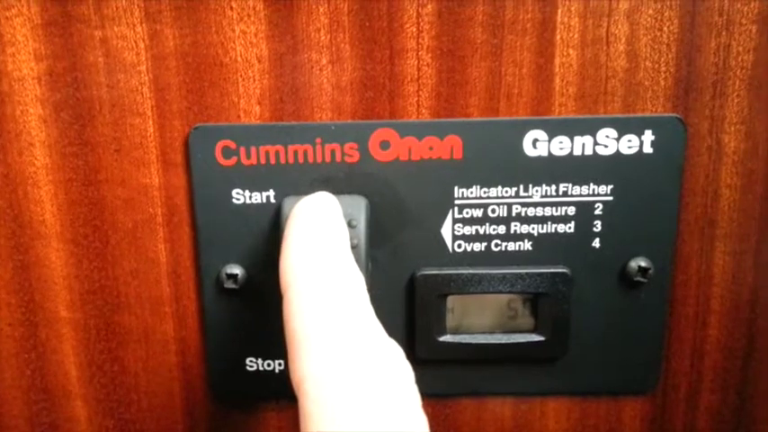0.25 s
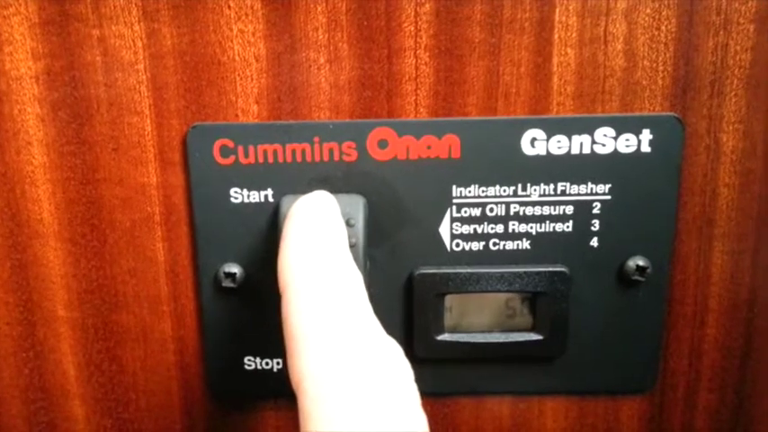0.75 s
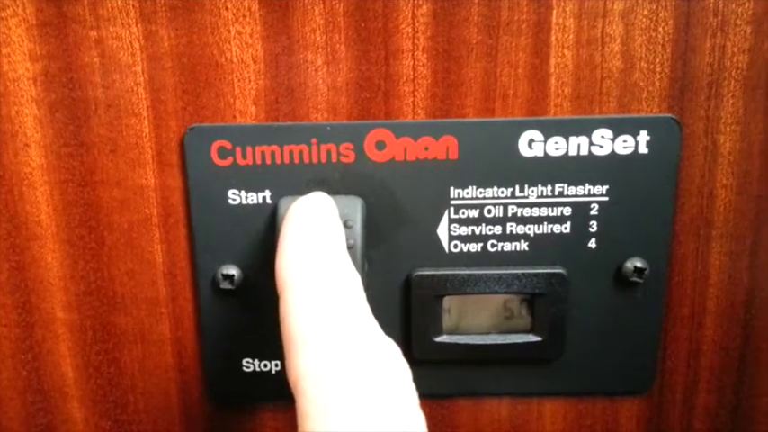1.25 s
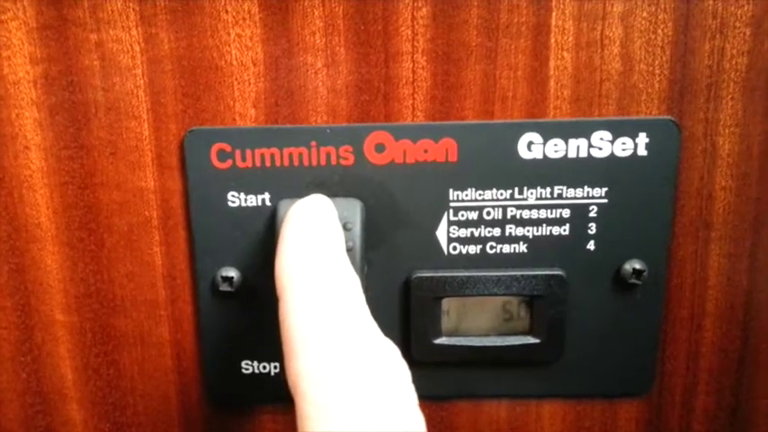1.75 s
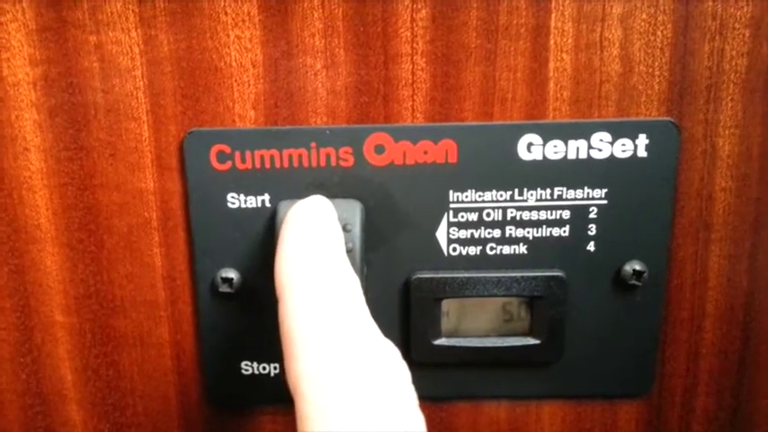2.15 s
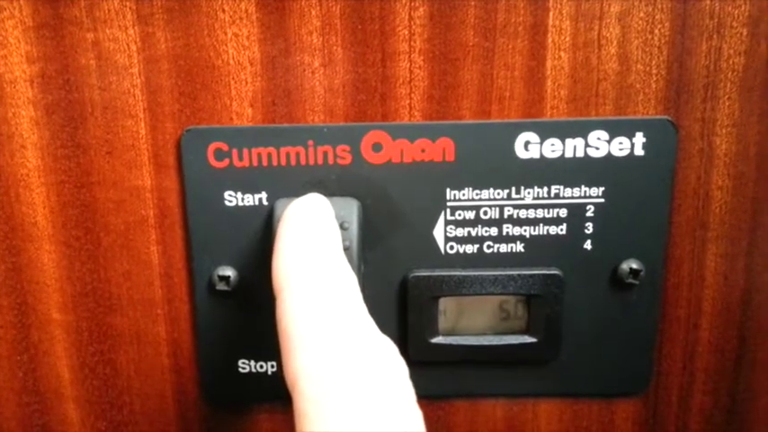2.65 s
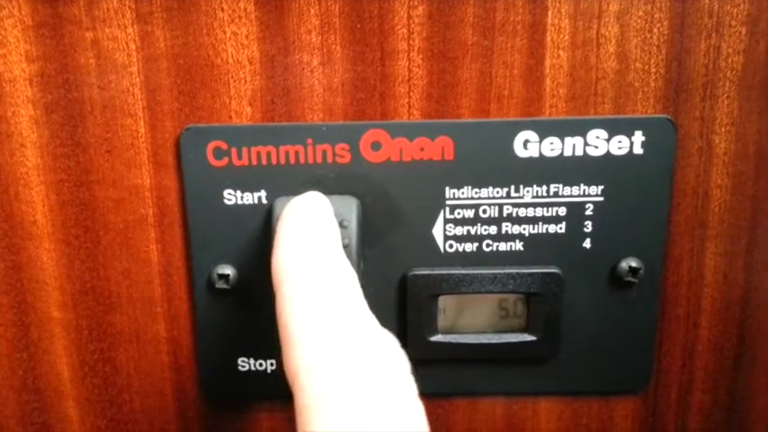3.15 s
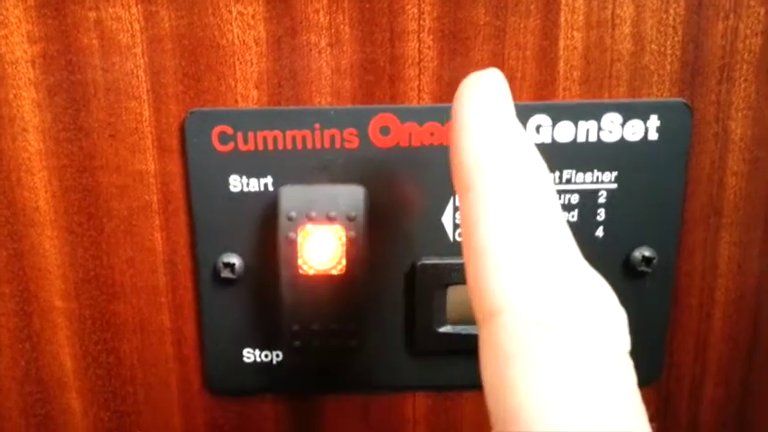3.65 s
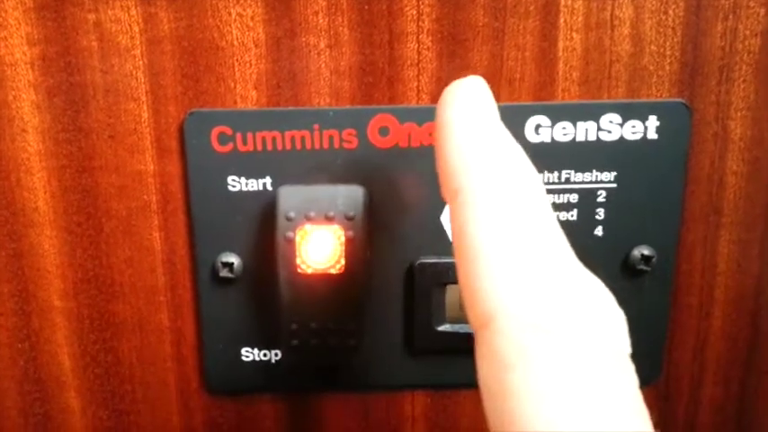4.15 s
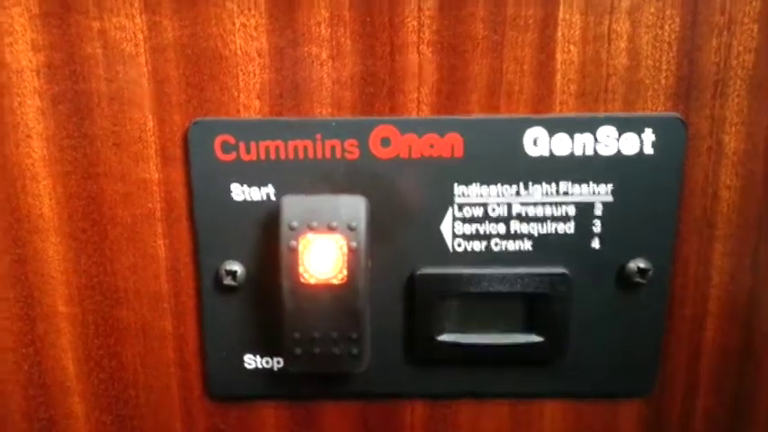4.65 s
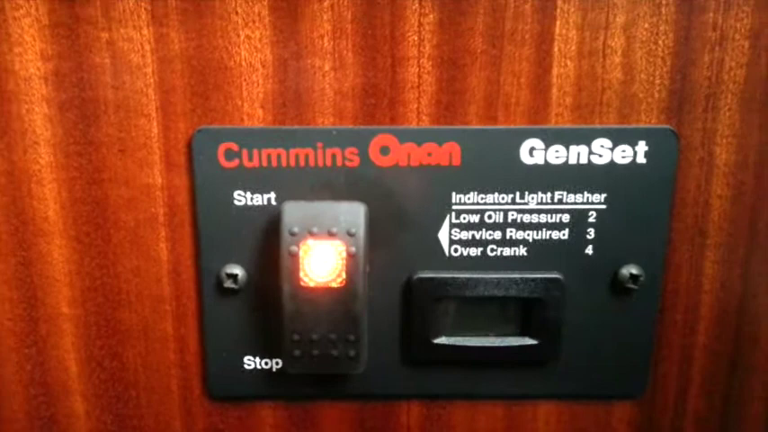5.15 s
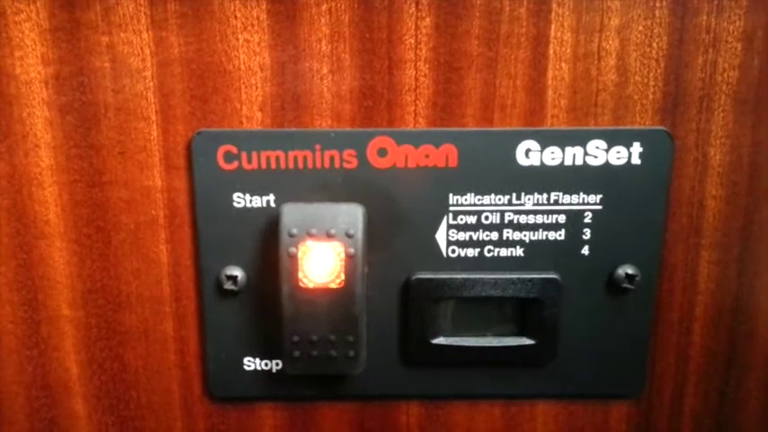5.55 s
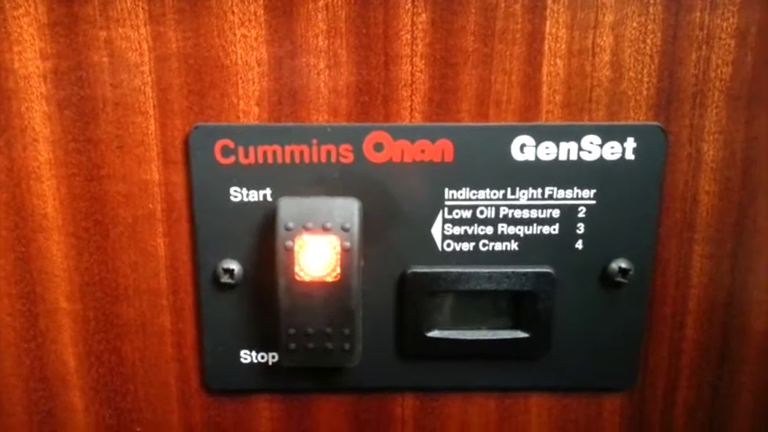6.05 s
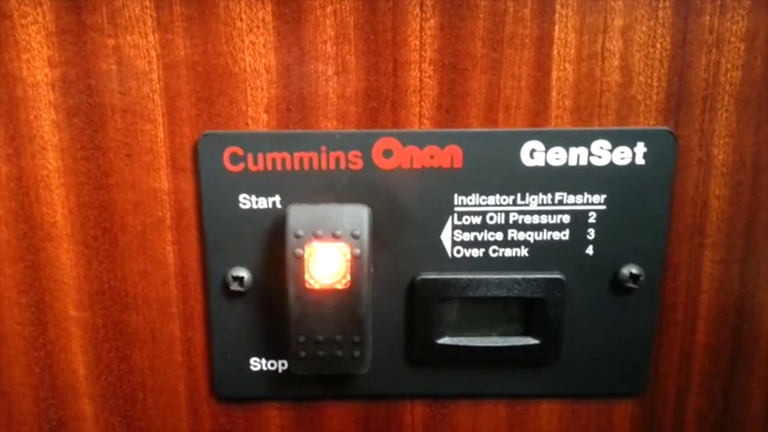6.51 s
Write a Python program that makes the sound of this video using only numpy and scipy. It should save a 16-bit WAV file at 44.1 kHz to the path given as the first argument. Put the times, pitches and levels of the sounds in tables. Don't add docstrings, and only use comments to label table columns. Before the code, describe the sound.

Indoors in a small padded camper cabin, a phone microphone is close to a wall switch, with the generator beneath the floor. From 0 to about 2.5 s the starter cranks steadily: gritty metallic gear whine, bright brush noise, low rumble and compression thumps at roughly 37 per second. From 2.55 s weak firings make the whine slip and rise; the engine catches near 2.9 s and the starter drops out. Low separate bangs accelerate, and at 3.29 s the rocker snaps back with tiny plastic bounces. Hard uneven firing knocks the floor and raps the cover, loudest around 3.4 to 3.7 s. By about 4 s it is a steady, buzzing low hum with faint hiss and thin electronic whine. Ticks and a cloth rub come at 4.6 s, small clicks at 6.02 s, then a relay clack at 6.07 s with a dying buzz and brief engine surge; the hum continues to the end at 6.8 s.

```python
import sys
import numpy as np
from scipy import signal
from scipy.io import wavfile

SR = 44100
rng = np.random.default_rng(int(sys.argv[2]) if len(sys.argv) > 2 else 0)


def volts(x):
    e = np.asarray(x, float) / 20
    return 10 ** e


def file_out(sig):
    cols = np.atleast_2d(sig).T
    lim = np.clip(cols, -1, 1)
    pcm = np.round(lim * 32767).astype(np.int16)
    wavfile.write(sys.argv[1], SR, pcm)


N = 298909
TIME = np.arange(N) / SR


def rms_one(x):
    return x / np.sqrt(np.mean(x ** 2) + 1e-20)


def ramp(x, start, length):
    return np.clip((x - start) / length, 0, 1)


def curve(rows):
    s, value = np.transpose(rows)
    return np.interp(TIME, s, value)


def swells(events, width_s):
    return sum(db * np.exp(-.5 * ((TIME - s) / width_s) ** 2) for s, db in events)


def jabs(events, fall_s):
    return sum(db * ramp(TIME, s, 0.0027) * np.exp(-np.maximum(TIME - s, 0) / fall_s) for s, db in events)


def drift(rate_hz):
    r = np.exp(-2 * np.pi * rate_hz * 40 / SR)
    slow = signal.lfilter([1], [1, -2 * r, r * r], rng.standard_normal(N // 40 + 2002))[2000:]
    return np.interp(np.arange(N) / 40, np.arange(len(slow)), rms_one(slow))


def ring(clicks, hz, t60):
    r, w = volts(-60 / (t60 * SR)), 2 * np.pi * hz / SR
    return signal.lfilter([0, np.sin(w)], [1, -2 * r * np.cos(w), r * r], clicks + 1e-18)


def resonances(x, peaks):
    out = 0
    for k, (hz, width_hz, db) in enumerate(peaks):
        r = np.exp(-np.pi * width_hz * 1.55 / SR)
        pole = [(1 - r * r) / 2, 0, (r * r - 1) / 2, 1, -2 * r * np.cos(2 * np.pi * hz / SR), r * r]
        out = out + (-1) ** k * volts(db) * signal.sosfilt([pole, pole], x)
    return rms_one(out)


def coloured(spectrum, patchy_db):
    hz, db = np.transpose(spectrum)
    out, white = 0, rng.standard_normal((2, N))
    edges = np.geomspace(hz[0], hz[-1], int(3 * np.log2(hz[-1] / hz[0])) + 1)
    for k, (low, high) in enumerate(zip(edges, edges[1:])):
        sos = signal.butter(2, [low, high], "band", fs=SR, output="sos")
        band = signal.sosfilt(sos, white[k % 2])
        band_db = np.interp(np.log(low * high) / 2, np.log(hz), db)
        out = out + volts(band_db + patchy_db * drift(9.1)) * band
    return rms_one(out)


def marks(phase):
    return np.diff(np.floor(phase), prepend=np.floor(phase[0]))


def orders(cycle, table, scatter, wobble_db):
    out = 0
    for multiple, db in table:
        start = scatter * 2 * np.pi * rng.random()
        out = out + volts(db + wobble_db * drift(6.0)) * np.cos(2 * np.pi * multiple * cycle + start)
    return out / np.sqrt(np.sum(volts(np.array(table)[:, 1]) ** 2) / 2)


def struck(hits, modes, scatter_db, dulls=0):
    s, db = np.transpose(hits)
    chance, out = rng.standard_normal((len(s), len(modes))), 0
    for k, (hz, mode_db, t60) in enumerate(modes):
        clicks = np.zeros(N)
        lost_db = dulls * 1000 * (s - s[0]) * max(np.log2(hz / 3300), 0)
        clicks[np.round(s * SR).astype(int)] = volts(db + mode_db - lost_db + scatter_db * chance[:, k])
        out = out + (-1) ** k * ring(clicks, hz, t60)
    return out


# frequency in Hz, level in dB per Hz.
HISS = [(1470, -29), (2500, -5), (3480, -18), (5330, -12), (6150, 0), (6780, -19), (13900, -21),
        (15000, -27)]


def air_hiss(effort_db):
    return coloured(HISS, patchy_db=2.0) * volts(-56 + 0.029 * effort_db) * (1.11 + 0.045 * ramp(TIME, 2.85, 0.036))


# frequency in Hz, level in dB rms.
WHINE = [(1668.5, -42.5), (6674, -73)]


def panel_whine():
    tones = 0
    for hz, db in WHINE:
        tones = tones + volts(db + 1.8 * drift(1.4)) * np.sin(2 * np.pi * hz * TIME + 0.66 * drift(3.4))
    return np.sqrt(2) * tones * ramp(TIME, 3.26, 0.41) ** .5


# start in seconds, level in dB, attack in seconds, hold in seconds,
# release in dB per second.
RUSTLE = [
    (4.424, -54, 0.03, .02, 200),
    (4.594, -40, 0.013, 0.012, 250),
    (4.619, -47, 0.021, 0.042, 500),
    (4.70, -60, .01, 0.03, 200),
]


def rustle():
    grains = rng.standard_normal(N) * volts(2.0 * drift(150))
    bright = signal.sosfilt(signal.butter(1, [3000.0, 12000.0], "band", fs=SR, output="sos"), grains)
    level = 0
    for s, db, attack, hold, release in RUSTLE:
        fallen_db = release * np.maximum(TIME - s - attack - hold, 0)
        level = level + ramp(TIME, s, attack) ** 2 * volts(db - fallen_db)
    return rms_one(bright) * level


# start in seconds, peak in dB, low edge in Hz, high edge in Hz,
# t60 in seconds.
TICKS = [(3.3395, -29, 1800, 15000, .02), (3.3401, -28.5, 4440, 5400, 0.022),
         (3.3405, -33, 6800, 7700, 0.022), (3.347, -36, 3000, 7000, 0.07), (3.3855, -37, 1800, 3510, .03),
         (3.386, -41, 3500, 7500, .02), (3.439, -32, 2500, 9300, 0.018), (3.446, -38, 3000, 9500, .09),
         (3.5505, -37.5, 4200, 5400, .03), (3.552, -44, 5500, 8000, .03), (4.5897, -20, 1800, 7500, .012),
         (4.5896, -36, 7500, 15000, .01), (4.597, -22, 1800, 3180, .02), (4.592, -34, 3500, 6500, 0.018),
         (4.597, -21.5, 5000, 9400, 0.028), (4.5968, -33, 9700, 15000, .015),
         (4.61, -26, 1800, 3440, 0.047), (4.612, -28, 6000, 13000, 0.057),
         (5.9988, -38, 9000, 14000, 0.034), (6.016, -24, 5600, 8400, 0.016),
         (6.016, -32, 2500, 5500, 0.014), (6.018, -30, 9000, 15000, .03), (6.027, -39, 8000, 14000, 0.027),
         (6.0255, -30, 3000, 7500, 0.023), (6.038, -43, 11000, 14000, .03)]


def ticks():
    out, length = np.zeros(N), 4000
    for s, db, low_hz, high_hz, t60 in TICKS:
        edges = [low_hz, np.clip(high_hz, low_hz + 200, .4 * SR)]
        dying = rng.standard_normal(length) * volts(-60 * TIME[:length] / max(t60, .003))
        burst = signal.sosfilt(signal.butter(3, edges, "band", fs=SR, output="sos"), dying)
        out[round(s * SR):][:length] += volts(db) * burst / np.max(np.abs(burst))
    return out


# frequency in Hz, level in dB, t60 in seconds.
SWITCH = [(330, -16, .014), (780, -16.5, 0.021), (1134, -13.5, .03), (1484, -10.5, 0.038),
          (1850, -18.5, .025), (2140, -19.5, .02), (2280, -12, .025), (3130, -7.5, 0.025), (4400, -19, .02),
          (5400, -16, 0.017), (6050, -9, .006), (7200, -11, 0.0085), (9750, -1, 0.0063),
          (12400, -30, .0055)]
# time in seconds, level in dB.
SNAPS = [
    (3.2872, -32),
    (3.2915, -24),
    (3.29307, -6),
    (3.29403, -11),
    (3.29531, -3),
    (3.2969, -8.5),
    (3.29786, -9.5),
    (3.2998, -9),
    (3.3068, -20),
]


def rocker_switch():
    return struck(SNAPS, SWITCH, scatter_db=4.5, dulls=0.66)


def cabin(x):
    tail = rng.standard_normal(9000) * volts(-60 * TIME[:9000] / 0.054)
    tail = signal.lfilter([.5], [1, -.5], tail)
    return x + volts(-27.5) * signal.fftconvolve(x, tail)[:N]


# frequency in Hz, level in dB, t60 in seconds.
RELAY = [(1286, -1.5, 0.022), (1510, -10, 0.035), (1730, -12.5, 0.11), (1910, -28, 0.14),
         (3390, -24, 0.054), (4190, -24, 0.04), (4600, -28, 0.04), (4640, -35, .15), (6650, -34, 0.1),
         (7500, -37, 0.2), (8300, -40, 0.13)]
# time in seconds, level in dB.
CLOSING = [
    (6.0695, -18),
    (6.072, -12),
    (6.078, -26),
    (6.089, -21),
    (6.11, -21),
    (6.1222, -26),
    (6.135, -25),
    (6.152, -26),
]
# frequency in Hz, level in dB per Hz.
THUD = [(530, -37), (900, -28), (1270, -17), (1360, -11), (1710, 5), (2140, -2), (3760, -27), (4580, -22),
        (7720, -28), (9500, -54), (12400, -71), (20900, -120)]
# frequency in Hz, width in Hz, level in dB.
PANELS = [(1750, 300, 5), (3250, 300, -6), (4250, 400, 3), (4700, 300, 0), (6500, 400, -10),
          (7500, 400, -4)]


def relay():
    since = TIME - CLOSING[0][0]
    after = np.maximum(since, 0)
    tail = coloured(THUD, patchy_db=1.5) * ramp(since, 0, .004) * volts(-32.5 - 60 * after / 1.6)
    buzz = resonances(rng.standard_normal(N), PANELS) * ramp(since, 0, .006) * volts(-45 - 60 * after / 1.16)
    return struck(CLOSING, RELAY, scatter_db=0.0, dulls=.03) + tail + buzz


# frequency in Hz, width in Hz, level in dB.
GEAR = [(790.5, 11, -4), (883, 23.4, -3.5), (985, 57, -7.5), (1139, 40, -4.5), (1454, 65, -10.5),
        (1559, 15, -8), (1847, 140, -10), (1966, 29.6, 2.5), (2055, 200, -9), (2118, 59, -2)]


def gear_whine(mesh, speed):
    helped = ramp(speed, 9.5, 1.4)
    alone = resonances(mesh, GEAR)
    raised = resonances(mesh, np.multiply(GEAR, [1.045, 1, 1]))
    whine = (1 - helped) * alone + helped * raised
    return whine / np.sqrt(1 - 2.0 * helped * (1 - helped))


# frequency in Hz, width in Hz, level in dB.
BRUSH = [(2745, 56, 1), (3225, 35, 2.5), (3706, 41, 2.5), (5770, 200, -7.5), (6220, 29, 3), (6520, 230, -2),
         (7290, 110, -5.5), (7800, 220, -2), (8900, 1000, -20), (9630, 140, -11), (9980, 140, -10)]
# frequency in Hz, width in Hz, level in dB.
SQUEAL = [(6660, 150, 1), (7500, 350, -20)]
# multiple of the cycle, level in dB.
CRANK_ORDERS = [(4, -67), (5, -70), (6, -57), (7, -55.5), (8, -65), (9, -51), (10, -51), (11, -66),
                (14, -37), (17, -55), (18, -40), (19, -54), (20, -49), (21, -43), (22, -55), (23, -44),
                (24, -46), (25, -45), (26, -46), (27, -47), (28, -42), (29, -52), (30, -47), (31, -48),
                (32, -47), (36, -50)]
# frequency in Hz, level in dB per Hz.
RUMBLE = [(82, -34), (140, -6.5), (236, -6), (454, -4.5), (777, 0), (1040, -9.5), (1150, -5), (1250, -5),
          (1540, -2), (1650, -5.5), (2000, -10.5), (2480, -29), (3420, -23.5), (3780, -26), (4500, -38),
          (5850, -69), (9900, -120)]
# time in seconds, load lost in dB.
SLIPS = [
    (2.548, 4),
    (2.655, 5),
    (2.779, 9),
    (2.884, 9),
]


def starter(cycle, speed, first_phase):
    out_db = -705 * np.maximum(TIME - 2.955, 0)
    slip_db = swells(SLIPS, 0.011)
    grip_db = 1.5 * ramp(speed, 9.6, 1.9) - slip_db
    overrun = ramp(speed, 10.3, 0.27)

    load = volts(2.0 * np.cos(2 * np.pi * (4 * cycle - .35)) + 0.16 * np.cos(2 * np.pi * (2 * cycle - .6)))
    teeth = rms_one(marks(14 * cycle) * volts(2.0 * rng.standard_normal(N)))
    tooth_grind, brush_grind = rng.standard_normal((2, N))
    whine = gear_whine(load * (teeth + 1.77 * tooth_grind), speed) * volts(-31.5 + 0.75 * grip_db + out_db)
    brush = resonances(np.sqrt(load) * (0.15 * teeth + brush_grind), BRUSH)
    brush = brush * volts(-50 + 0.97 * grip_db + out_db - 4.1 * overrun)
    squeal = overrun * resonances(brush_grind, SQUEAL) * volts(-51.5 - 2.5 * slip_db + out_db)

    motor = first_phase + np.cumsum(np.minimum(speed, 9.45)) / SR
    driving = np.clip((10.1 - speed) / .5, 0, 1)
    thump = volts(-4.5 + 2.1 * overrun) * orders(cycle, CRANK_ORDERS[:8], scatter=0.48, wobble_db=1.0)
    hum = driving * orders(motor, CRANK_ORDERS[8:], scatter=1.0, wobble_db=2.0)
    pulses = (thump + hum) * volts(-40 + 0.095 * out_db)
    rumble = coloured(RUMBLE, patchy_db=1.5) * volts(-34 + 0.12 * grip_db + 0.77 * out_db)
    return whine + brush + squeal + pulses + rumble


# frequency in Hz, level in dB, t60 in seconds.
COVER = [(637, -5, 0.022), (1030, -3, 0.022), (1530, -18, .02), (1960, -8, .025), (2220, -8, .02),
         (2324, -5, 0.031), (3050, -18, .015)]
# time in seconds, level in dB.
RAPS = [(3.3373, -24), (3.3862, -21), (3.4391, -26), (3.48, -24.5), (3.5199, -20.5), (3.5548, -34),
        (3.5912, -27), (3.6262, -23), (3.6561, -33), (3.6935, -26), (3.7314, -33), (3.7638, -42)]


def cover_raps():
    return struck(RAPS, COVER, scatter_db=1.5)


# frequency in Hz, level in dB, t60 in seconds.
FLOOR_MODES = [(67.5, 4, 0.073), (94, 8, 0.078), (134, 0, 0.075), (171.3, 1, 0.12), (233, 2.5, 0.099),
               (289, 1, 0.07), (419, -5.5, 0.036), (602, -7.5, 0.059)]
# time in seconds, peak in dB.
KNOCKS = [(3.114, -30), (3.159, -22), (3.199, -22), (3.309, -15), (3.333, -14), (3.359, -17), (3.394, -10),
          (3.438, -12), (3.46, -11), (3.488, -4.5), (3.521, -8), (3.56, -12), (3.582, -8), (3.622, -16),
          (3.639, -14), (3.68, -15), (3.72, -19)]


def floor_knocks():
    blows = struck(KNOCKS, FLOOR_MODES[1:], scatter_db=4.0)
    return volts(-10) * signal.lfilter([.1], [1, -.9], blows) / 2


def floor_bangs(cycle):
    fired = marks(cycle - .05) - 0.49 * marks(cycle - .47) + 0.4 * marks(cycle - .75)
    low, high = 0, 0
    for k, (hz, db, t60) in enumerate(FLOOR_MODES):
        uneven = fired * volts(db + 2.8 * rng.standard_normal(N))
        roar = volts(db - 31.5) * rng.standard_normal(N)
        bang = (-1) ** k * ring(uneven + roar, hz, t60)
        if hz < 110:
            low = low + bang
        else:
            high = high + bang
    racing = slice(int(3.1 * SR), int(3.7 * SR))
    return low / np.std(low[racing]), high / np.std(high[racing])


# time in seconds, effort in dB.
EFFORT = [(2.9, -8), (3.1, -2.5), (3.25, -5.5), (3.34, 7), (3.52, 5), (3.59, 10.5), (3.72, 8.5), (3.78, 2),
          (3.93, 4), (4.05, 0.5), (6.78, 0.3)]


def effort():
    rise_s, fall_s = 0.043, 0.078
    after = np.maximum(TIME - 6.07, 0)
    jolt = np.minimum(after / rise_s, np.exp((rise_s - after) / fall_s))
    return curve(EFFORT) + 5.5 * jolt


# frequency in Hz, level in dB per Hz.
CLATTER = [(76, -28), (130, -9.5), (194, -11.5), (248, -4.5), (414, -12), (608, -7.5), (812, -12.5),
           (972, -11.5), (1390, -12), (1640, -15), (1780, -20), (1960, -19), (2350, -19), (2620, -46),
           (3500, -79), (4550, -76), (7700, -120)]
# frequency in Hz, width in Hz, level in dB.
VALVE = [(2000, 73, 3.5), (2306, 45, 3), (2840, 330, -21)]


def engine_clatter(cycle, speed, effort_db, slap_db, settled):
    level_db = -32.5 + 0.37 * effort_db
    gate = volts(2.0 * np.cos(2 * np.pi * (cycle - .9)) + 1.1 * np.cos(2 * np.pi * (3 * cycle - .3)))
    clatter = gate * coloured(CLATTER, patchy_db=0.36) * volts(level_db + 0.27 * slap_db)
    seating = np.exp(-((cycle - .85) % 1) / 0.41) + 0.87 * (volts(slap_db) - 1)
    valve = resonances(seating * rng.standard_normal(N), VALVE)
    return clatter + valve * volts(level_db - 16.5 + 0.4 * (6.0 - settled) * (speed > 19))


# multiple of the cycle, level in dB.
SHAKE_ORDERS = [
    (1, -49),
    (2, 4),
    (3, -9),
]
# multiple of the cycle, level in dB.
RUN_ORDERS = [(4, -17.5), (5, -10.5), (6, -15), (7, -11), (8, -7), (9, -12), (10, -12.5), (11, -17),
              (12, -18.5), (13, -23), (14, -20), (15, -46), (16, -17), (17, -42), (18, -27.5), (19, -17),
              (20, -19.5), (21, -22), (22, -19), (23, -21.5), (24, -21.5), (25, -37), (27, -28), (29, -28),
              (30, -26.5), (31, -19), (32, -29), (35, -45), (36, -25)]
# time in seconds, swell (or dip, if
# negative) in dB.
KICKS = [(2.954, 2), (3.02, -1), (3.125, 12), (3.2, 6.5), (3.27, 8), (3.32, 7.5), (3.38, 2.5), (3.52, 1),
         (3.6, 0.5), (3.66, 2.5), (3.74, -2)]
# time in seconds, rise (or dip, if
# negative) in dB.
SLAPS = [(3.339, 5), (3.387, 4), (3.444, 5), (3.4805, 11), (3.5205, 11), (3.556, -18), (3.591, 12),
         (3.6255, 10), (3.66, -3), (3.694, 0), (3.727, -4)]


def engine(cycle, speed, effort_db):
    kick_db, slap_db = swells(KICKS, 0.03), jabs(SLAPS, 0.0046)
    lit = ramp(TIME, 2.85, 0.036)
    settled = ramp(TIME, 3.7, 0.37) ** 0.62
    spinning = ramp(speed, 25.5, 5.76)
    low, high = floor_bangs(cycle)

    shake = spinning * orders(cycle, SHAKE_ORDERS, scatter=0.094, wobble_db=0.5) + (1 - spinning) * low
    unbalance_db = 12.5 * np.log2(speed / speed[-1])
    shake = shake * volts(-22.5 + 0.34 * effort_db + unbalance_db + kick_db)
    hum = orders(cycle, RUN_ORDERS, scatter=0.97, wobble_db=2.0)
    bang = 0.89 * settled * hum + 0.97 * (1 - settled) * high
    bang = bang * volts(-29.5 + effort_db + 0.37 * kick_db + 0.05 * slap_db)
    return lit * (shake + bang + engine_clatter(cycle, speed, effort_db, slap_db, settled))


# time in seconds, speed in engine cycles per second.
SPEED = [(0, 9.312), (2.46, 9.312), (2.71, 10.3), (2.9, 11.0), (3.09, 13.4), (3.25, 16.2), (3.38, 21.1),
         (3.63, 29.0), (3.77, 31.6), (3.89, 30.9), (4.02, 31.2), (4.7, 31.064), (6.78, 31.064)]


def scene():
    speed, first_phase = curve(SPEED), .03
    cycle = first_phase + np.cumsum(speed) / SR
    effort_db = effort()
    panel = air_hiss(effort_db) + panel_whine() + rustle() + cabin(rocker_switch() + ticks()) + relay()
    generator = starter(cycle, speed, first_phase) + cover_raps() + floor_knocks()
    return (panel + generator + engine(cycle, speed, effort_db))[None]


def top_cut(x):
    return signal.sosfilt(signal.butter(12, 15770, fs=SR, output="sos"), x)


def record(dry):
    cut = signal.sosfilt(signal.butter(4, 44.0, "high", fs=SR, output="sos"), dry)
    soft = .99 * np.tanh(cut / .99)
    mix = signal.sosfilt(signal.cheby2(14, 40, 14900, fs=SR, output="sos"), soft)
    return top_cut(mix)


dry = scene()
out = record(dry)
file_out(out)
```